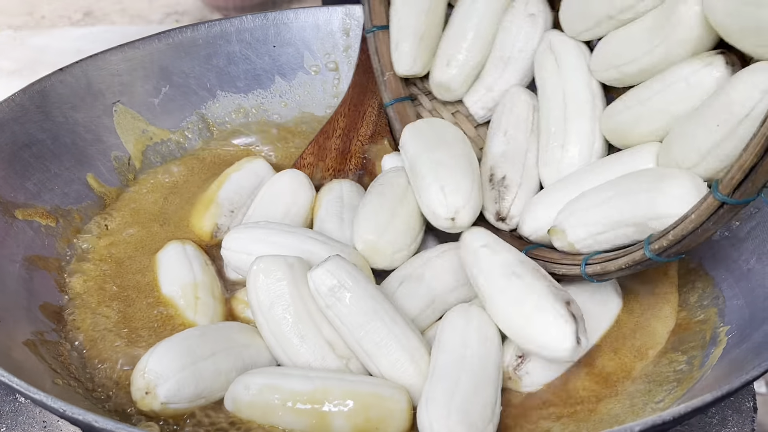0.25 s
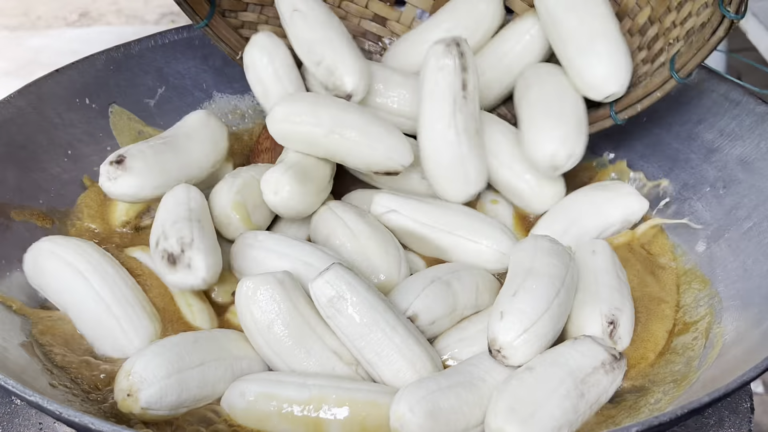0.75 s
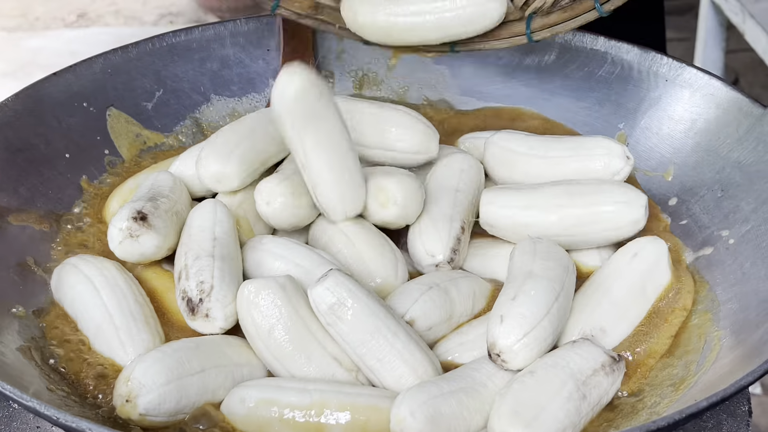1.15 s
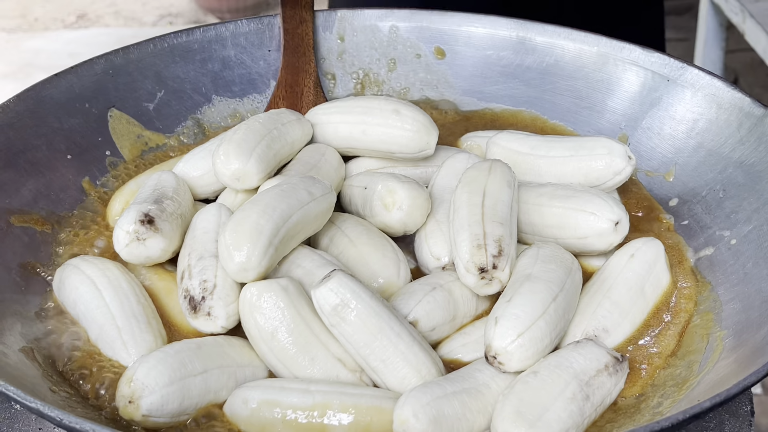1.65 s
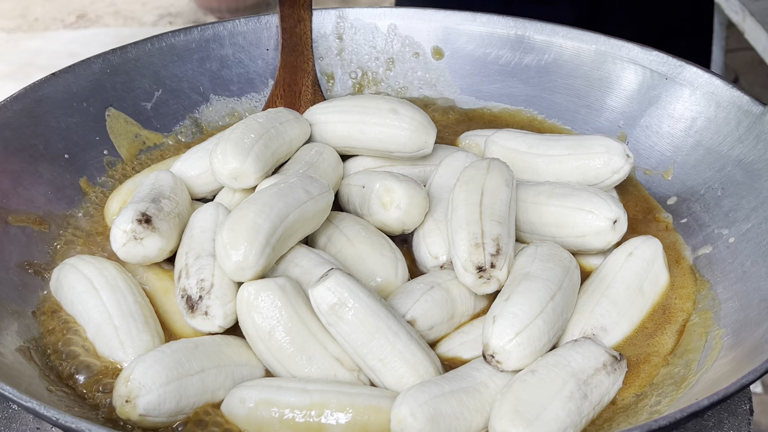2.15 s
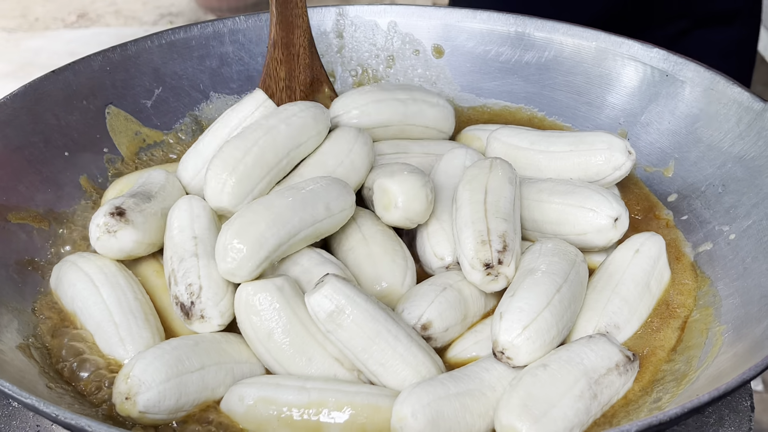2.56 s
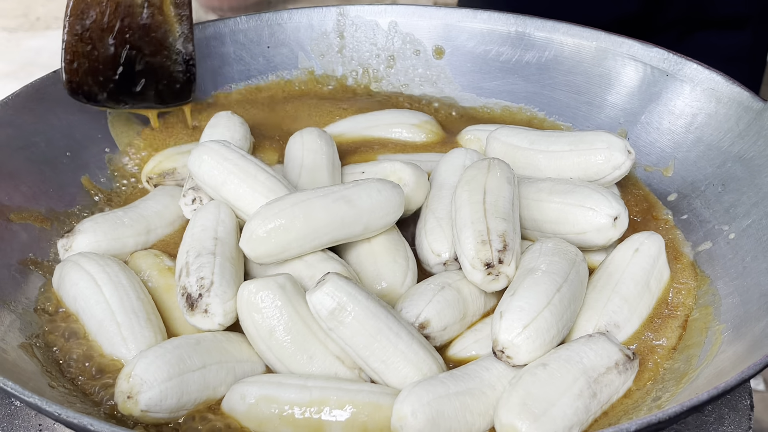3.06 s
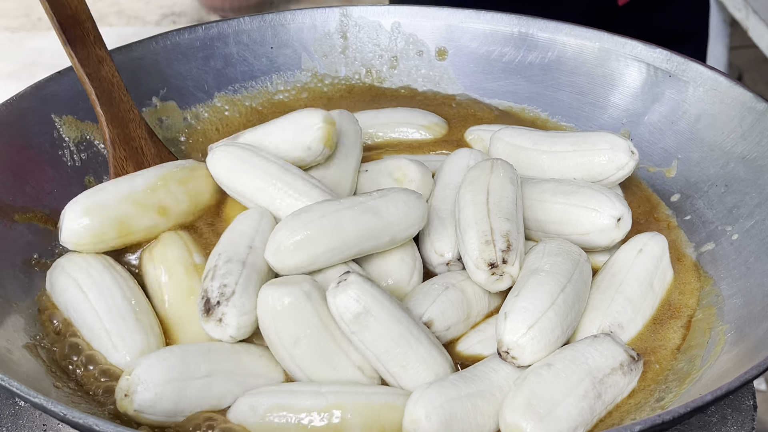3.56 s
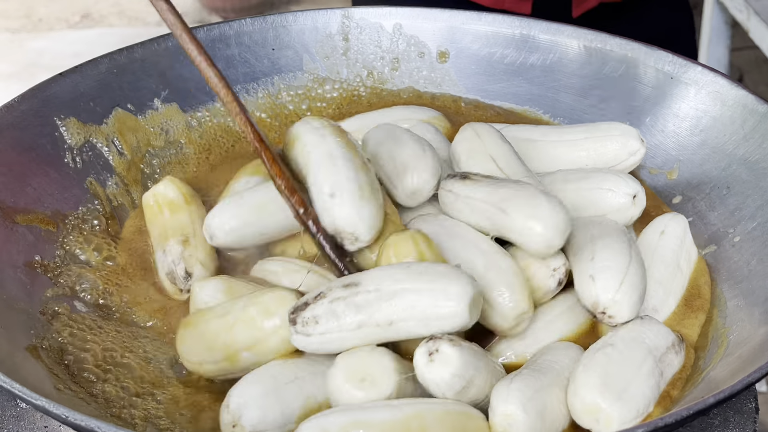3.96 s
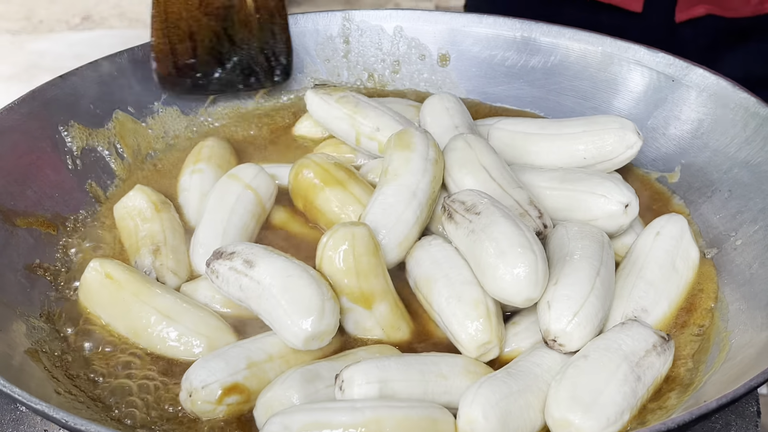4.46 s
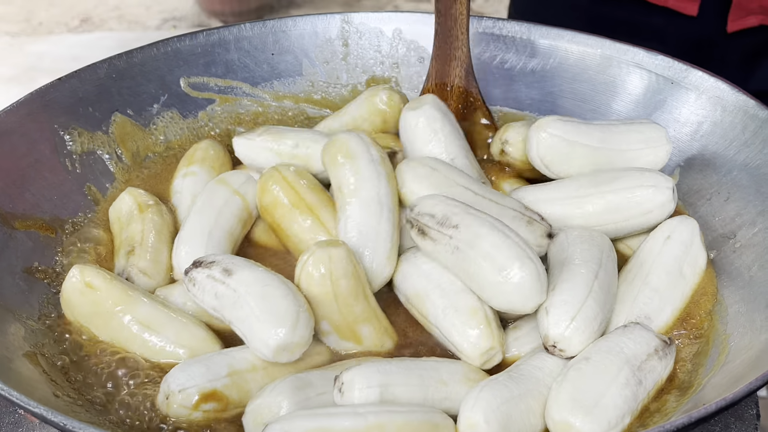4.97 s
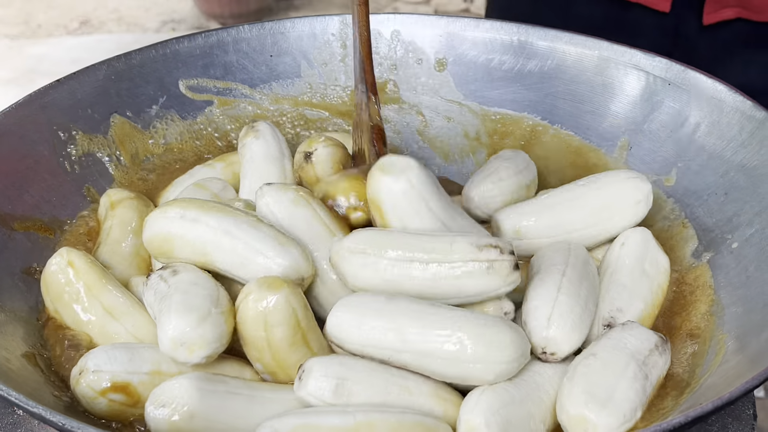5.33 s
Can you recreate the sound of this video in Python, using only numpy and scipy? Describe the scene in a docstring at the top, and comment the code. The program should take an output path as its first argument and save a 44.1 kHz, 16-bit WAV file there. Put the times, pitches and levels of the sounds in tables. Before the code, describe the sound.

Syrup sizzles and bubbles in a metal wok, close and central, while an engine idles with a low throb in faint outdoor air throughout. At about 0.5 seconds a basket taps the rim with a short metallic ring, and peeled bananas tumble in with soft, low thuds until 1 second. Sharp spits and a bright surge of hiss peak near 0.8 seconds, then ease into a spitting sizzle of tiny bursting bubbles. Around 3 seconds come a few dull bumps as a wooden spatula knocks the wok. From 3.3 to 3.7 seconds it sticks and slips down the metal with loud rasps, short groans and a sharp squeak, and the sizzle flares. From about 4.3 seconds the spatula pushes wetly through the fruit, with knocks near 4.6 and 5.2 seconds and faint squeaks. The sizzle continues more softly to the end at about 5.6 seconds.

```python
"""Outdoors in a yard, an engine idles near a wok of boiling syrup.
A basket taps the rim and peeled bananas tumble in with soft thuds. Syrup washes up the hot wall,
boils off in a bright surge and settles to a spitting sizzle of tiny bursting bubbles.
A wooden spatula knocks the wok, sticks and slips down the metal with rasps, groans and squeaks,
then ploughs wetly through the fruit."""
import sys
import numpy as np
from scipy import signal
from scipy.fft import rfft, irfft, next_fast_len
from scipy.io import wavfile

SR = 44100
rng = np.random.default_rng(int(sys.argv[2]) if len(sys.argv) > 2 else 0)


def to_wav(sig):
    """Store sig (one row per channel, or 1-D mono) as 16-bit WAV at the path in sys.argv[1].

    Samples outside -1..1 are clipped; the rate is SR.
    """
    pcm = np.clip(np.atleast_2d(sig), -1, 1) * 32767
    pcm = np.round(pcm).astype(np.int16)
    wavfile.write(sys.argv[1], SR, pcm.T)  # frames by channels


N = 246959

# idle speed: (time [s], firing rate [1/s])
IDLE = [(0, 15.79), (1.25, 15.79), (2.75, 16.1), (4.25, 16.53), (5.6, 16.77)]
# punch of each of the three cylinders: (level [dB])
CYLINDER_DB = [-6.5, -1.2, 2.2]
# exhaust resonances: (pitch [Hz], level [dB], t60 [s])
EXHAUST_MODES = [(41.3, -27, 0.051), (61.16, -29, 0.21), (95.5, -46, .3), (125, -49, 0.36)]
# open-air bed: (time [s], level [dB])
YARD_LEVEL = [(0, -49), (1.4, -47), (2.8, -47.5), (4.0, -47.5), (5.6, -49.5)]

# EQ curves of the noise layers: (frequency [Hz], relative level [dB])
YARD_EQ = [(20, -24), (40, 7.5), (90, 11), (150, 2), (250, -5), (400, -7), (650, -10.5), (920, -2.5),
           (1280, -6), (1530, -7.5), (1850, -8.5), (2500, -20.5), (8000, -93.5)]
YARD_SIDE_EQ = [(30, 7), (110, -11), (250, 8), (550, 8.5), (1000, 12.5), (1500, 16), (2500, -9),
                (5000, -73), (10000, -49)]
SIZZLE_EQ = [(200, -38), (700, -19), (1600, -29), (3000, 5), (5000, -3), (7000, 2), (9000, 5), (10400, 4),
             (11500, -10), (12500, -30), (13200, -49), (15500, -54)]
WASH_EQ = [(200, -31), (700, -13), (1600, -21), (3000, -9), (5000, -6.5), (7000, -0.5), (9000, 3),
           (10400, 4), (11500, -6), (12500, -14.5), (13400, -25), (15500, -25)]
FROTH_EQ = [(300, 0), (1000, -8), (1900, 0.5), (2250, 8), (3100, 2), (4200, 0), (6000, -3.5), (12000, -56)]
TUMBLE_EQ = [(50, 4), (150, 6), (300, 1), (480, -12.5), (750, -24), (1400, -38), (4000, -48)]
RASP_EQ = [(100, -36), (250, 4.5), (470, -9.5), (650, -2), (900, 1), (1250, -10.5), (1900, -1),
           (2300, -3.5), (3050, -3), (4300, -6), (8500, -9.5), (11000, -8.5), (13000, -57)]
PLOUGH_EQ = [(150, -7), (480, -4), (800, 1), (1200, 0), (1700, 3), (3000, 0), (4800, -10), (9000, -45)]
FLARE_EQ = [(500, -41), (2000, -7), (3200, -1.5), (4200, -5.5), (6000, -2), (8500, 1.5), (10500, 2),
            (12400, -13.5), (13300, -57)]

# simmering bed: (time [s], relative sizzle level [dB], relative froth level [dB])
SIMMER = [(0, -56.5, -55.5), (.6, -53, -53), (1.2, -55.5, -56.5), (2.3, -58.5, -54), (2.65, -51, -50),
          (3.1, -55, -52), (4.3, -54.5, -51), (5.3, -64, -58.5), (5.6, -56.5, -57.5)]
# syrup washing up the hot wall and boiling off: (crest time [s], relative level [dB], rise [s], t60 [s])
WASHES = [(.06, -50.5, 0.31, 0.73), (.785, -27.5, 0.075, 0.8), (.815, -39.5, 0.028, 0.75),
          (1.15, -38, 0.37, 1.3), (1.53, -41.5, 0.45, 0.9), (1.86, -45.5, 0.32, 2.6),
          (3.28, -47, 0.15, 4.9), (3.47, -46.5, 0.12, 1.5), (3.95, -44, 0.36, 1.6),
          (4.585, -48.5, 0.027, 5.6), (4.86, -46.5, 0.34, 0.61)]
# syrup closing behind the blade: (time [s], length [s], level [dB], settling time [s])
WAKES = [(3.776, 0.38, -54, 0.14), (4.98, 0.053, -54, 0.064), (5.413, 0.23, -56.5, 0.085)]
# loads of fruit tumbling in: (time [s], length [s], level [dB])
TUMBLES = [(.48, 0.12, -49), (.685, 0.048, -41.5), (.76, .08, -44), (.97, 0.021, -45.5)]
# basket tapping the rim: (time [s], level [dB])
RIM_TAPS = [(.523, -38), (.548, -53)]
# ring of the rim: (pitch [Hz], gain [dB], t60 [s])
RIM_MODES = [(900, -8, 0.3), (1540, -10, 0.42), (2150, 0, 0.25)]
# damped blows of fruit and wood: (time [s], level [dB], pitch [Hz], t60 [s])
THUDS = [(.524, -44, 686, 0.023), (0.547, -37, 664, 0.05), (0.764, -26, 804, 0.0048),
         (0.773, -36, 218, 0.052), (0.834, -39, 231, 0.051), (0.976, -34.5, 253, 0.041),
         (.987, -39, 325, 0.054), (2.992, -35, 257, 0.032), (3.092, -39, 525, 0.032),
         (3.211, -36, 242, 0.079), (3.693, -46, 397, 0.021), (4.562, -32.5, 303, 0.032),
         (4.573, -33, 2700, .014), (4.931, -42, 447, 0.03), (5.031, -40, 516, 0.025),
         (5.2066, -28, 885, 0.015), (5.208, -34, 2400, .006), (5.208, -40, 4700, 0.0083),
         (5.21, -40, 317, 0.029)]
# fruit shoved along the wet wall: (crest time [s], level [dB], rise [s], t60 [s])
PUSHES = [(.702, -50, 0.03, 0.067), (4.29, -55, 0.079, 1), (4.75, -46.5, 0.084, 1),
          (4.83, -45, 0.061, 0.78), (4.92, -50, .04, 0.33), (5.035, -47, 0.023, 0.13)]
# hollow between blade and wall: (time [s], pitch [Hz])
HOLLOW_PITCH = [(4.74, 1040), (4.85, 1270), (4.95, 910)]
# spits of syrup on hot metal: (time [s], level [dB], t60 [s])
SPITS = [(.7225, -27, 0.051), (.7283, -18.5, 0.027), (.7299, -18, 0.026), (.7851, -27, 0.067),
         (1.0575, -37, .04), (1.326, -35, 0.11), (1.417, -29.5, 0.019), (1.470, -43, 0.055),
         (1.554, -32, 0.05), (1.567, -32.5, 0.046), (1.755, -36.5, 0.047), (1.80, -33, 0.025),
         (1.826, -34, 0.032), (1.874, -33.5, 0.076), (1.975, -33, 0.053), (2.006, -30.5, 0.016),
         (2.109, -36.5, .11), (2.243, -41, .05), (2.371, -34.5, 0.022), (2.413, -41, 0.07),
         (2.485, -38.5, 0.15), (2.561, -37.5, 0.06), (2.625, -39, 0.14), (2.829, -38, .025),
         (2.885, -47, 0.067), (2.987, -43.5, 0.15), (3.125, -42, 0.088), (3.209, -36, 0.027),
         (3.698, -22.5, 0.013), (4.132, -38, 0.044), (4.26, -32.5, 0.019), (4.575, -39, 0.036),
         (5.208, -38, 0.0083)]
# spatula knocks: (time [s], level [dB], favoured pitch [Hz])
KNOCKS = [(3.0885, -45, 490), (3.093, -45, 904), (3.428, -43, 970), (3.542, -49, 904), (3.625, -44, 960),
          (3.645, -45, 784), (3.696, -42.5, 700)]
# free ring of the wok: (pitch [Hz], gain [dB], t60 [s])
WOK_MODES = [(233, -6.5, 0.31), (278, -5.5, 0.16), (346, -12, 0.1), (400, -6.5, .1), (433, 1.5, 0.13),
             (460, -5, 0.12), (550, -1, 0.055), (630, -1, 0.074), (784, -11, 0.67), (904, 0.5, 0.25),
             (981, -3, 0.14), (1073, -4, 0.17), (1452, -6, 0.18)]
# blade dragging on the wok floor: (time [s], length [s], relative level [dB])
DRAGS = [(3.24, 0.088, -57), (3.315, 0.12, -42.5), (3.47, 0.13, -46.5), (3.626, 0.021, -41.5),
         (3.695, 0.015, -43.5), (3.74, 0.072, -50)]
# blade juddering down the wall, slip by slip: (time [s], groan level [dB], rasp level [dB])
JUDDERS = [(3.318, -20, -22.5), (3.324, -47, -22), (3.335, -22.5, -25), (3.3507, -20.5, -26.5),
           (3.362, -28, -26), (3.3758, -18.5, -39), (3.394, -38, -36), (3.426, -25.5, -39),
           (3.444, -28, -52), (3.624, -30.5, -40)]
# resonances of the grating blade: (pitch [Hz], gain [dB], t60 [s])
BLADE_MODES = [(1394, -7, 0.38), (1962, -13, 0.26), (1950, -15, 0.14), (2602, -13, 0.16), (2680, -8, 0.072),
               (2910, -2, 0.053), (3250, -5.5, 0.18), (3219, -5, 0.19), (3424, -9, 0.1), (3564, -6, 0.15),
               (3750, -11.5, 0.12)]
# wet blade meeting dry hot wall: (time [s], level [dB], t60 [s])
FLARES = [(3.329, -21.5, 0.15), (3.4065, -17, 0.12), (3.414, -18, 0.23)]
# blade squeaking on wet metal: (time [s], length [s], pitch [Hz], level [dB], waver [share of pitch])
SQUEAKS = [(3.406, 0.0176, 3190, -21.5, 0.033), (3.405, 0.059, 8270, -28.5, .002),
           (3.407, 0.045, 6200, -39, .002), (4.662, 0.035, 3880, -47, .035), (4.661, 0.092, 5570, -50, .08),
           (4.85, 0.064, 4840, -50, 0.029), (5.278, 0.09, 5150, -55, 0.0055),
           (5.398, 0.075, 3790, -53, .012), (5.418, 0.19, 3190, -54, .006)]
# stereo phase offset: (frequency [Hz], lead of the left channel [rad])
LEFT_LEAD = [(0, 0), (1250, .1), (1640, -.4), (2100, -.1), (2350, 0), (2700, .2), (3000, .65), (3900, .55),
             (4500, .33), (5100, .27), (5350, .03), (7400, .03), (7700, .32), (8200, .2), (8500, 0),
             (8750, -.15), (9000, -.85), (9500, -1.8), (10000, -2.6), (10260, -3.14), (10550, -3.8),
             (11100, -4.75), (11650, -5.4), (12000, -6.3), (12300, -6.5), (12600, -7.2), (13000, -7.7),
             (13300, -9.3), (14300, -9.5), (14600, -12.5)]


def from_db(db):
    """Decibels to gain."""
    return 10 ** (np.asarray(db) / 20)


def rms_one(x):
    """Scale to unit rms."""
    return x / np.sqrt(np.mean(x ** 2) + 1e-20)


def automation(rows, column=1):
    """One column of a breakpoint curve, at every sample."""
    rows = np.array(rows)
    return np.interp(np.arange(N) / SR, rows[:, 0], rows[:, column])


def drift(rate_hz):
    """Smooth random modulation; rms 1."""
    hop, run_in = 40, 2000
    r = np.exp(-2 * np.pi * rate_hz * hop / SR)
    noise = rng.standard_normal(N // hop + run_in + 2)
    slow = signal.lfilter([1], [1, -2 * r, r * r], noise)[run_in:]
    return np.interp(np.arange(N) / hop, np.arange(len(slow)), rms_one(slow))


def eq(x, curve):
    """Shape a signal with an EQ curve; rms 1."""
    size = next_fast_len(N)
    hz, db = np.transpose(curve)
    bins = np.maximum(np.fft.rfftfreq(size, 1 / SR), 1)
    gain = from_db(np.interp(np.log(bins), np.log(hz), db))
    return rms_one(irfft(rfft(x, size) * gain, size)[..., :N])


def grains(per_s, spread_db):
    """Random tiny clicks of uneven size; rms 1."""
    sizes = from_db(spread_db * np.minimum(rng.exponential(1, N), 5)) * rng.choice([-1, 1], N)
    return rms_one(sizes * (rng.random(N) < per_s / SR))


def ring(clicks, hz, t60):
    """A unit click sets a sine of height 1 ringing."""
    r, w = from_db(-60 / (t60 * SR)), 2 * np.pi * hz / SR
    return signal.lfilter([0, np.sin(w)], [1, -2 * r * np.cos(w), r * r], clicks + 1e-18)


def swept(x, hz, width_hz, block=128):
    """Band-pass with a moving centre; rms 1."""
    out, state = np.zeros(N), np.zeros(2)
    r, w = np.exp(-np.pi * width_hz / SR), 2 * np.pi * hz / SR
    for i in range(0, N, block):
        poles = [1, -2 * r * np.cos(w[i]), r * r]
        out[i:i + block], state = signal.lfilter([1, 0, -1], poles, x[i:i + block], zi=state)
    return rms_one(out)


def clicks_at(rows):
    """One click for each (time [s], level [dB])."""
    out = np.zeros(N)
    for s, db, *_ in rows:
        out[int(s * SR)] += from_db(db)
    return out


def bursts(rows):
    """Hard-attack envelope from (time [s], level [dB], t60 [s])."""
    power = np.zeros(N)
    for s, db, t60 in rows:
        start = int(s * SR)
        age = np.arange(min(N - start, SR // 2)) / SR
        power[start:start + len(age)] += from_db(db - 60 * age / t60) ** 2
    return np.sqrt(power)


def surges(rows):
    """Swell-and-decay envelope from (crest time [s], level [dB], rise [s], t60 [s])."""
    t, power = np.arange(N) / SR, 0
    for s, db, rise, t60 in rows:
        attack = np.clip(1 + (t - s) / rise, 0, 1)
        decay = from_db(db - 60 * np.clip((t - s) / t60, 0, 2))
        power += (attack * decay) ** 2
    return np.sqrt(power)


def strokes(rows, attack_s, t60):
    """Attack-hold-release envelope from (time [s], length [s], level [dB])."""
    t, envelope = np.arange(N) / SR, 0
    for s, length, db, *_ in rows:
        attack = np.clip((t - s) / attack_s, 0, 1)
        release = from_db(db - 60 * np.clip((t - s - length) / t60, 0, 2))
        envelope = np.maximum(envelope, attack * release)
    return envelope


def engine(uneven_db=0.5, head_start=0.066, lowpass_hz=400):
    """Three unequal cylinders fire in turn into a booming exhaust."""
    firing_count = np.cumsum(automation(IDLE)) / SR + head_start
    at = np.flatnonzero(np.diff(np.floor(firing_count), prepend=-1))
    firings = np.zeros(N)
    firings[at] = from_db(np.resize(CYLINDER_DB, len(at)) + uneven_db * drift(20)[at])
    lowest, *upper = [from_db(db) * ring(firings, hz, t60) for hz, db, t60 in EXHAUST_MODES]
    return signal.sosfilt(signal.butter(1, lowpass_hz, fs=SR, output="sos"), sum(upper) - lowest)


def yard(lean_left_db=2.5, side_db=-13):
    """A wide, low bed of open-air noise, leaning left."""
    sides = np.array([[1], [-1]])
    mid = from_db(lean_left_db * sides) * eq(rng.standard_normal(N), YARD_EQ)
    side = from_db(side_db) * eq(rng.standard_normal(N), YARD_SIDE_EQ)
    return from_db(automation(YARD_LEVEL)) * (mid + side * sides)


def sizzle(simmer, wash_lift, gain_db=3, splutter_db=1.43, tick_db=-9):
    """Fine spray fizzes at the hot edge, each wash boils off brightly, and bubble skins snap as ticks."""
    spray = eq(grains(per_s=17000, spread_db=2.5), SIZZLE_EQ) * simmer
    boil_off = eq(grains(per_s=15000, spread_db=2), WASH_EQ) * surges(WASHES)
    ticks = from_db(tick_db) * eq(grains(per_s=70, spread_db=1), WASH_EQ) * simmer * np.sqrt(wash_lift)
    return (spray + boil_off + ticks) * from_db(gain_db + splutter_db * drift(18))


def froth(wash_lift, gain_db=2.5, heave_db=2.05, follow=0.39):
    """Coarser foam heaves in the middle of the wok, stirred up by each wash."""
    level = from_db(automation(SIMMER, column=2) + gain_db + heave_db * drift(14)) * wash_lift ** follow
    return eq(grains(per_s=7000, spread_db=1), FROTH_EQ) * level


def crackle(sizzle_level, level_db=-56, t60=0.02):
    """Lone droplets flash to steam in tiny puffs, louder the harder the syrup sizzles."""
    fade = from_db(-60 / (t60 * SR))
    puffs = signal.lfilter([1], [1, -fade], np.abs(grains(per_s=55, spread_db=-1)) + 1e-18)
    steam = eq(puffs * rng.standard_normal(N), SIZZLE_EQ)
    return from_db(level_db) * rms_one(np.sqrt(sizzle_level)) * steam


def bubbles(level_db=-57, low_hz=2143, high_hz=4330, ring_cycles=29, pitch_count=20):
    """Bursting bubbles blip, each ringing briefly at its own pitch."""
    pops = grains(per_s=2500, spread_db=2)
    voice = rng.integers(0, pitch_count, N)
    pitches = np.geomspace(low_hz, high_hz, pitch_count)
    blips = sum(ring(pops * (voice == k), hz, ring_cycles / hz) for k, hz in enumerate(pitches))
    return from_db(level_db) * rms_one(blips)


def pocket(wash_lift, fresh_hz=3300, rest_hz=2265, rest_db=-63.5, slosh_db=2, follow=0.31):
    """Froth sounds through a pocket in the fruit; behind the blade it swells, starts high and sinks."""
    t, hz = np.arange(N) / SR, np.full(N, float(rest_hz))
    for s, _, _, settle_s in WAKES:
        hz[t > s] = rest_hz + (fresh_hz - rest_hz) * np.exp((s - t[t > s]) / settle_s)
    swell = strokes(WAKES, attack_s=0.017, t60=0.89) * from_db(slosh_db * drift(45))
    level = np.hypot(from_db(rest_db), swell) * wash_lift ** follow
    return swept(grains(per_s=4600, spread_db=1), hz, width_hz=190) * level


def tumble():
    """Bananas drop into the wok in a low, soft patter."""
    patter = eq(grains(per_s=500, spread_db=-0.3), TUMBLE_EQ)
    return patter * strokes(TUMBLES, attack_s=0.0081, t60=0.33)


def basket(crack_db=-3, crack_t60=0.03):
    """The basket taps the rim: a short crack with a metallic tail."""
    rim = sum(from_db(db) * ring(clicks_at(RIM_TAPS), hz, t60) for hz, db, t60 in RIM_MODES)
    crack = bursts([(s, db + crack_db, crack_t60) for s, db in RIM_TAPS])
    return rim + eq(rng.standard_normal(N), RASP_EQ) * crack


def thuds():
    """Fruit and wood land, each blow a quickly damped tone."""
    return sum(ring(clicks_at([(s, db)]), hz, t60) for s, db, hz, t60 in THUDS)


def plough(catch_db=1.5, hollow_db=1):
    """Fruit is shoved through syrup: wet friction, coloured by the hollow between blade and wall."""
    push = surges(PUSHES) * from_db(catch_db * drift(40))
    friction = eq(grains(per_s=2200, spread_db=4.7), PLOUGH_EQ)
    hollow = swept(grains(per_s=3000, spread_db=2.5), automation(HOLLOW_PITCH), width_hz=380)
    return (friction + from_db(hollow_db) * hollow) * push


def spits():
    """Flung drops hit hot metal in sharp bursts of hiss."""
    return eq(rng.standard_normal(N), WASH_EQ) * bursts(SPITS)


def wok_ring(drag, slip_db=-24.5, wander_db=4.5, pressed_t60_share=0.43, focus_db=10, focus_octaves=0.15):
    """Spatula knocks ring the wok, most near one pitch; dragging stirs its modes by turns, damped."""
    slips = grains(per_s=2000, spread_db=3.5) * drag * from_db(slip_db)
    out = np.zeros(N)
    for hz, db, t60 in WOK_MODES:
        knocks = clicks_at([
            (s, force_db + focus_db * np.exp(-(np.log2(hz / favoured_hz) / focus_octaves) ** 2))
            for s, force_db, favoured_hz in KNOCKS])
        rubbing = slips * from_db(wander_db * drift(36))
        out += from_db(db) * (ring(knocks, hz, t60) + ring(rubbing, hz, t60 * pressed_t60_share))
    return out


def scrape(drag, drag_db=-4, blade_db=-7.5, attack_s=0.0051, slip_t60=0.25):
    """Wood sticks and slips on metal: drags and judders rasp, and the judders shake the blade."""
    grating = surges([(s + attack_s, db, attack_s, slip_t60) for s, _, db in JUDDERS])
    rasp = eq(grains(per_s=5300, spread_db=1.5), RASP_EQ) * np.hypot(grating, drag * from_db(drag_db))
    catches = grains(per_s=1200, spread_db=1.4)
    blade = sum(from_db(db) * rms_one(ring(catches, hz, t60)) for hz, db, t60 in BLADE_MODES)
    return rasp + from_db(blade_db) * blade * grating


def judders(start_hz=540, end_hz=190, length_s=0.0157):
    """Each slip is a short groan that falls in pitch as the blade slows and sticks again."""
    progress = np.linspace(0, 1, int(length_s * SR))
    hz = start_hz + (end_hz - start_hz) * progress
    groan = np.sin(2 * np.pi * np.cumsum(hz) / SR) * np.sin(np.pi * np.sqrt(progress)) ** 2
    return signal.fftconvolve(clicks_at(JUDDERS), groan)[:N]


def flares():
    """The sizzle flares where the wet blade meets the dry hot wall."""
    return eq(grains(per_s=25000, spread_db=2), FLARE_EQ) * bursts(FLARES)


def squeaks(rough_db=4.5):
    """Brief whistles of the wet blade: each catches quickly, wavers in pitch and fades."""
    out = np.zeros(N)
    wander, rough = drift(220), from_db(rough_db * drift(120))
    for s, length, hz, db, waver in SQUEAKS:
        at = np.arange(int(s * SR), min(int((s + length) * SR), N))
        pitch = hz * (1 + waver * wander[at])
        tone = rms_one(np.sin(2 * np.pi * np.cumsum(pitch) / SR) * rough[at])
        out[at] += from_db(db) * tone * np.sin(np.pi * np.sqrt(np.linspace(0, 1, len(at))))
    return out


def echoes(x, t60=0.067, predelay_s=0.002, band_hz=(380, 6000)):
    """A short, dull scatter from nearby things, different on each side."""
    age = np.arange(SR // 3) / SR
    scatter = rng.standard_normal((2, len(age))) * from_db(-60 * age / t60) * (age > predelay_s)
    scatter /= np.sqrt(np.sum(scatter ** 2, axis=1, keepdims=True))
    scatter = signal.sosfilt(signal.butter(2, band_hz, "band", fs=SR, output="sos"), scatter)
    return signal.fftconvolve(x[None], scatter, axes=1)[:, :N]


def scene(echo_send_db=-10):
    """The wok sits close and central, with echo on its hits and scrapes; engine and yard lie behind."""
    simmer = from_db(automation(SIMMER))
    wash_lift = np.hypot(1, surges(WASHES) / simmer)  # gain of the washes over the simmer
    wet = sizzle(simmer, wash_lift) + spits() + froth(wash_lift) + crackle(simmer * wash_lift)
    wet += bubbles() + flares() + pocket(wash_lift) + plough()
    drag = strokes(DRAGS, attack_s=0.0055, t60=0.24)
    spatula = wok_ring(drag) + scrape(drag) + judders() + squeaks()
    struck = spatula + basket() + tumble() + thuds()
    return wet + struck + from_db(echo_send_db) * echoes(struck) + engine() + yard()


def record(dry, low_cut_hz=29, high_cut_hz=15800):
    """Master: a left-right phase offset spreads the treble; the deepest rumble and the top are cut."""
    size = next_fast_len(N + 8192)
    hz = np.fft.rfftfreq(size, 1 / SR)
    low_cut = 1 / np.hypot(1, (low_cut_hz / np.maximum(hz, 1)) ** 5)
    lead = np.exp(1j * np.interp(hz, *np.transpose(LEFT_LEAD)))
    stereo = irfft(rfft(dry, size) * low_cut * [lead, np.ones_like(lead)], size)[:, :N]
    return signal.sosfilt(signal.ellip(10, .1, 80, high_cut_hz, fs=SR, output="sos"), stereo)


dry = scene()
out = record(dry)
to_wav(out)
```